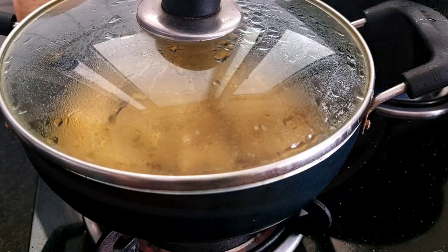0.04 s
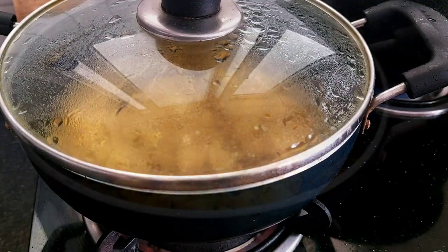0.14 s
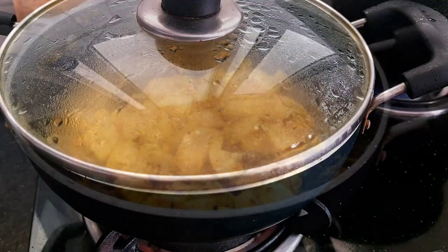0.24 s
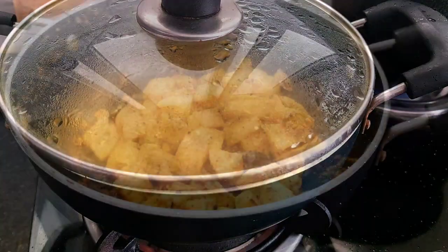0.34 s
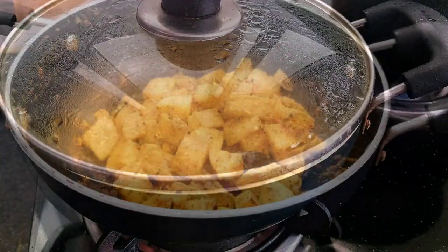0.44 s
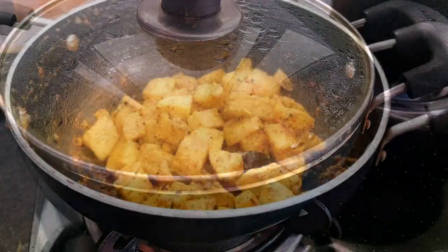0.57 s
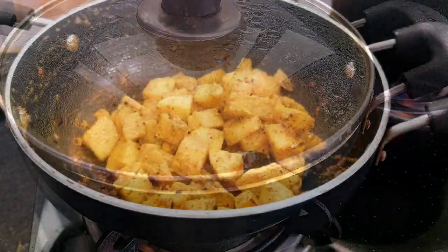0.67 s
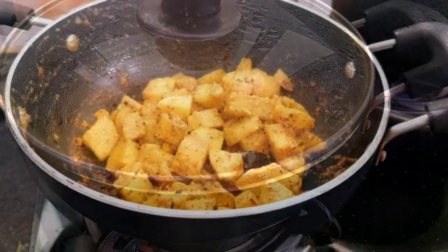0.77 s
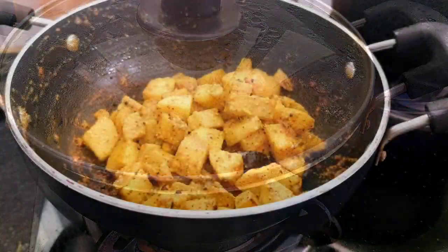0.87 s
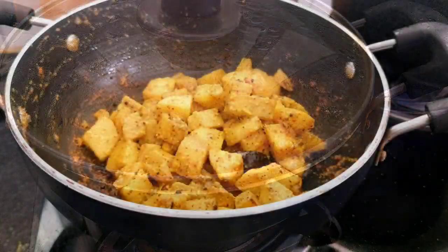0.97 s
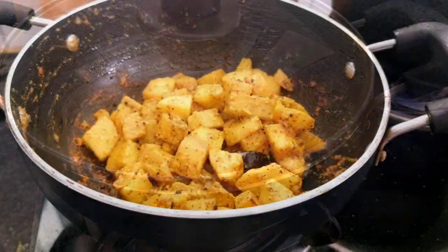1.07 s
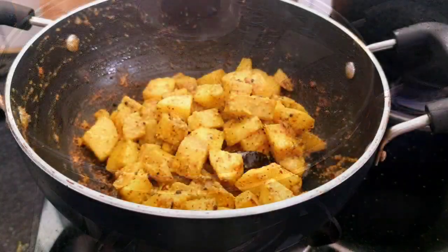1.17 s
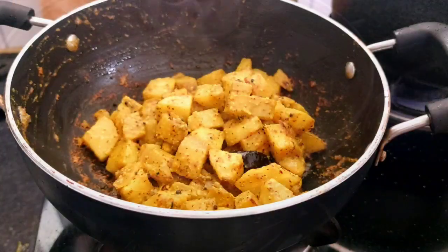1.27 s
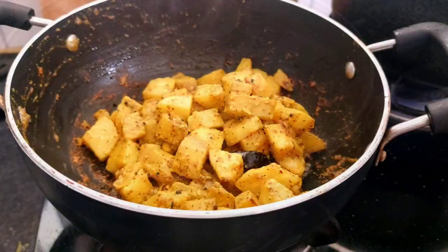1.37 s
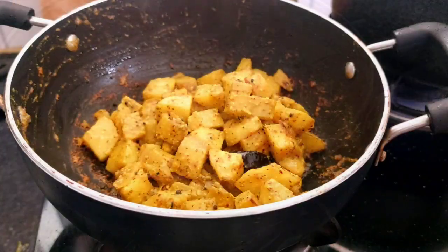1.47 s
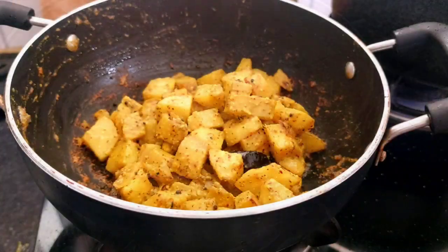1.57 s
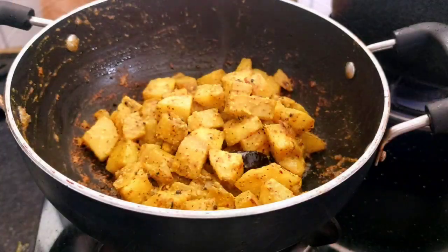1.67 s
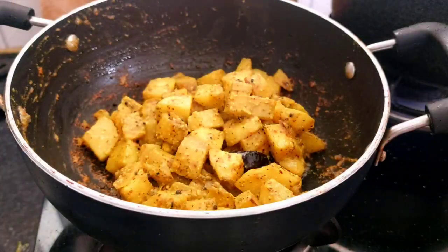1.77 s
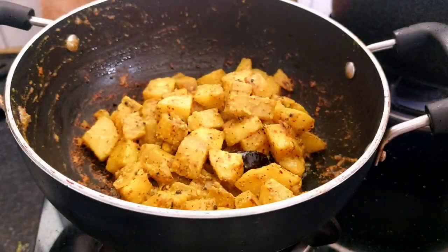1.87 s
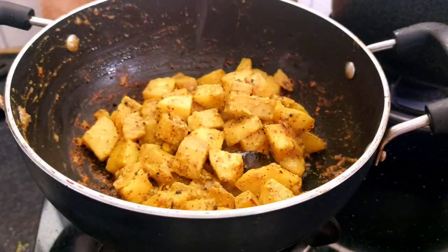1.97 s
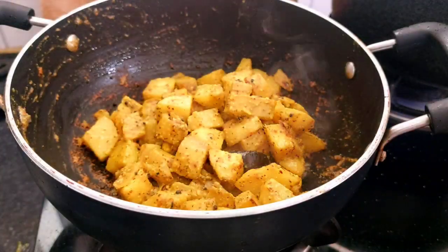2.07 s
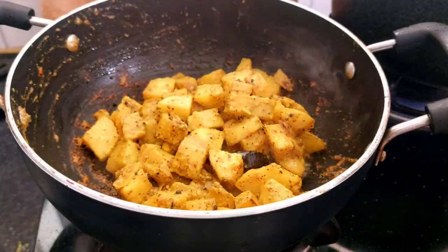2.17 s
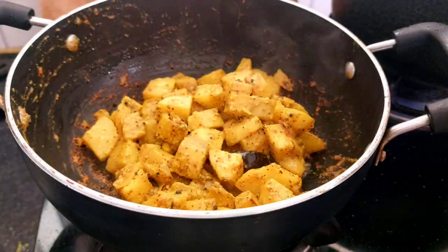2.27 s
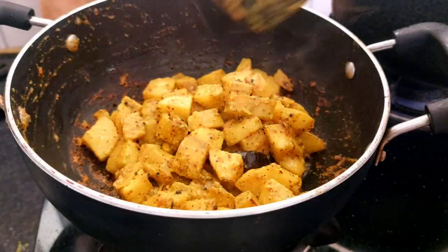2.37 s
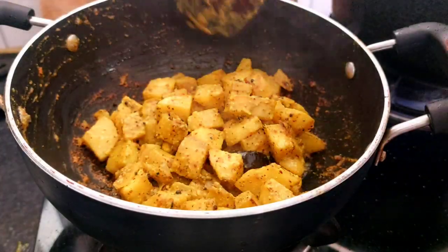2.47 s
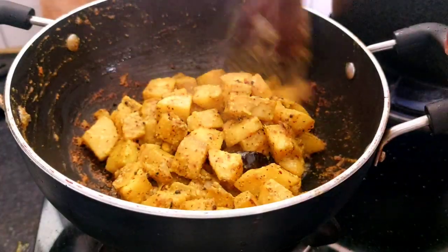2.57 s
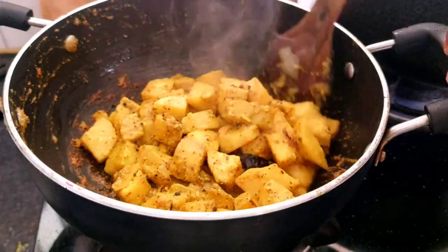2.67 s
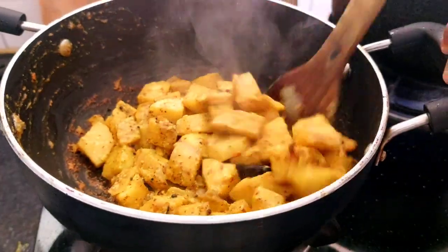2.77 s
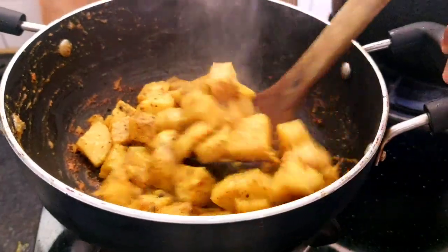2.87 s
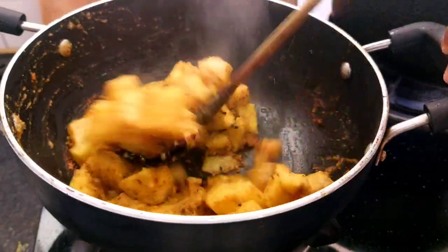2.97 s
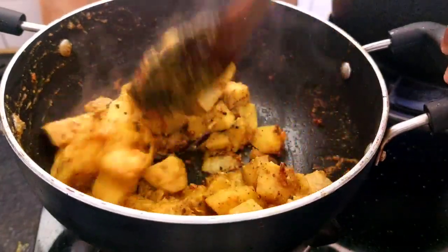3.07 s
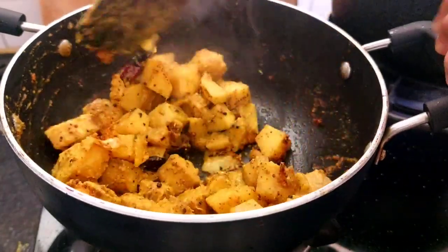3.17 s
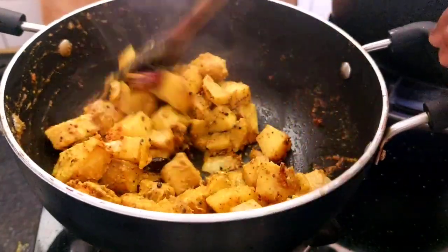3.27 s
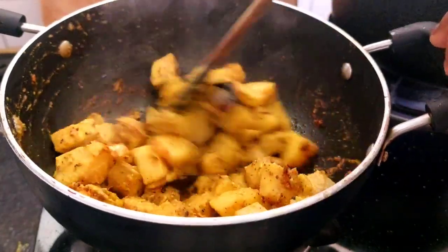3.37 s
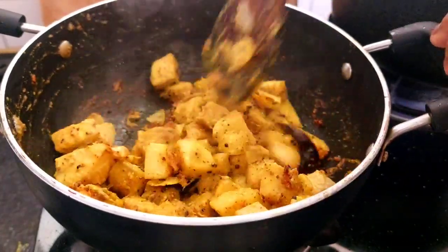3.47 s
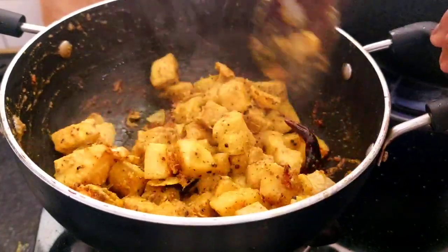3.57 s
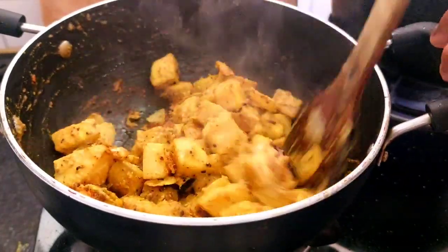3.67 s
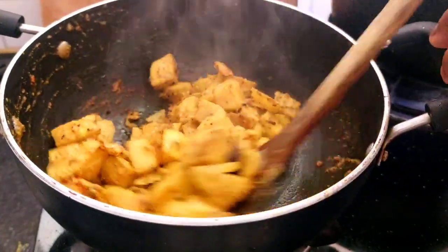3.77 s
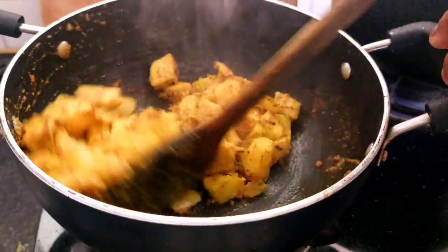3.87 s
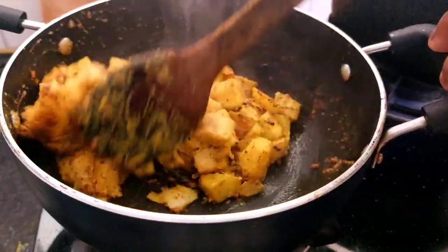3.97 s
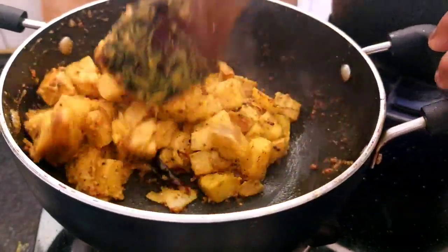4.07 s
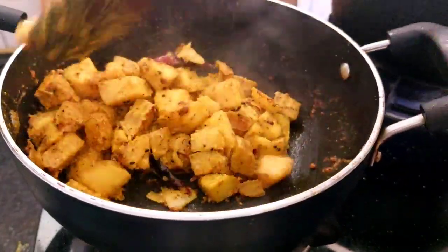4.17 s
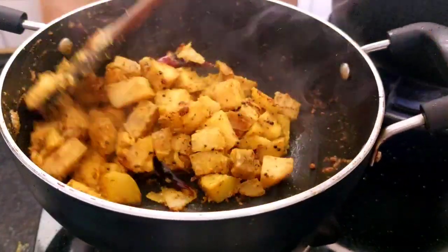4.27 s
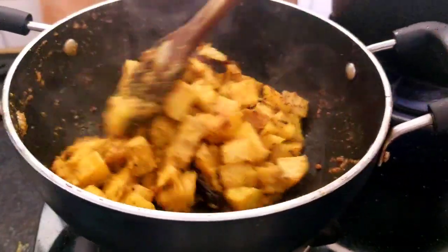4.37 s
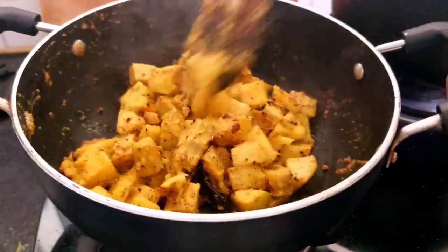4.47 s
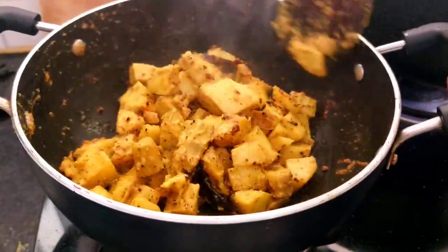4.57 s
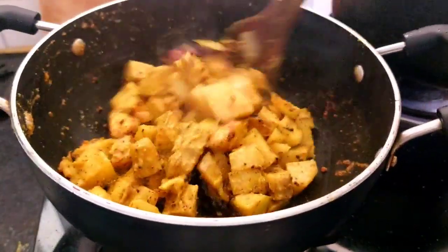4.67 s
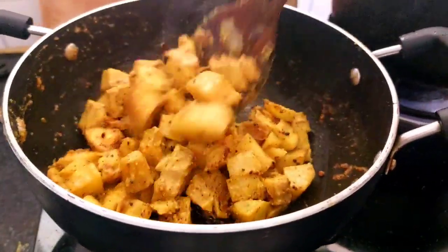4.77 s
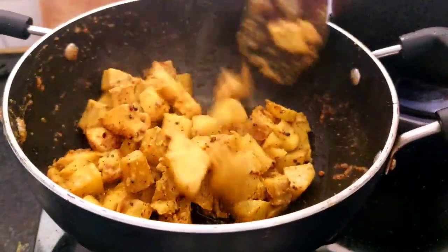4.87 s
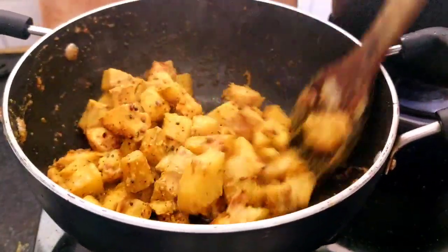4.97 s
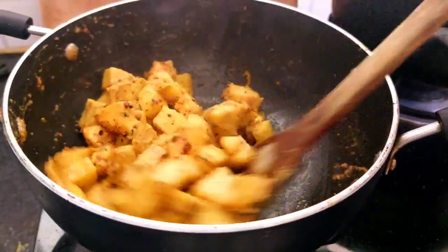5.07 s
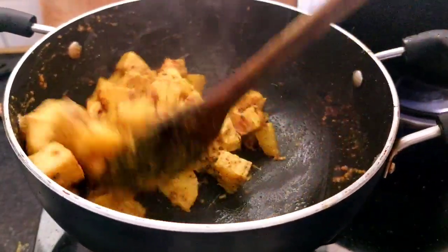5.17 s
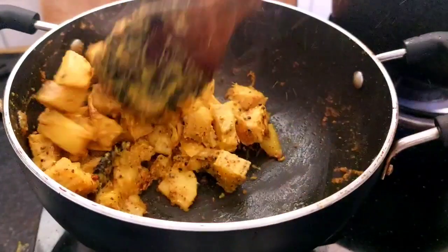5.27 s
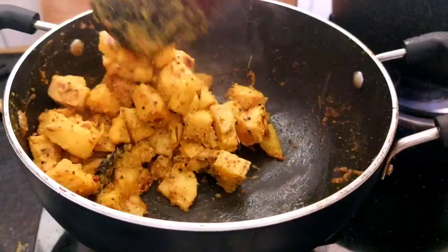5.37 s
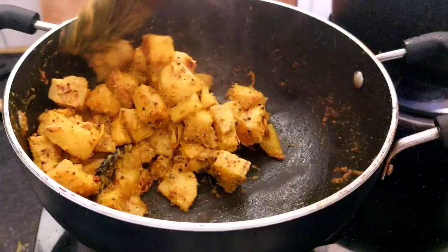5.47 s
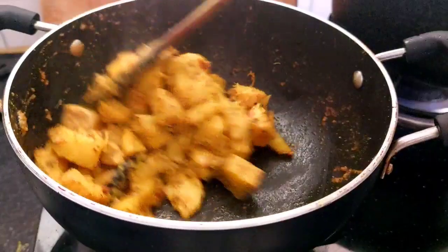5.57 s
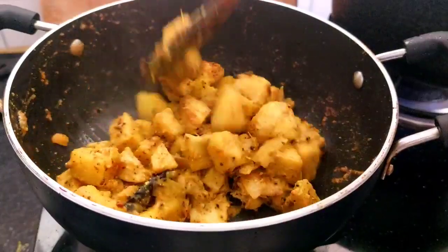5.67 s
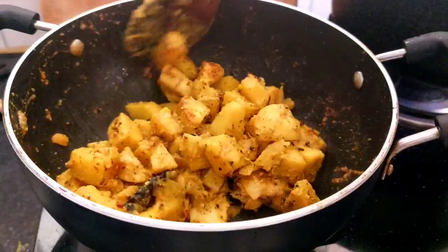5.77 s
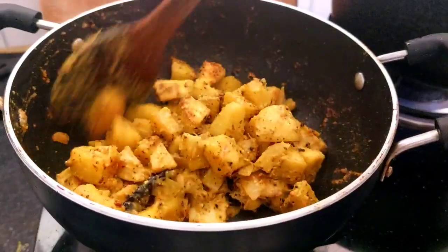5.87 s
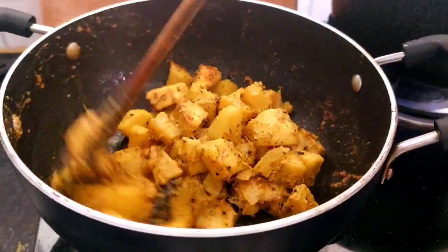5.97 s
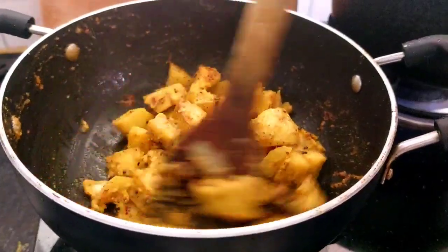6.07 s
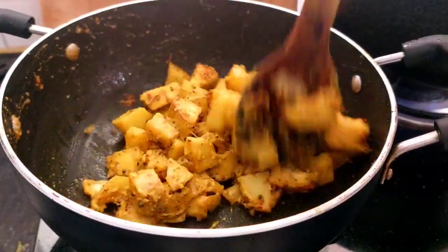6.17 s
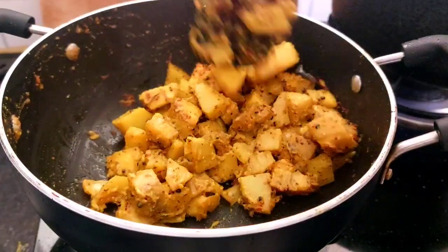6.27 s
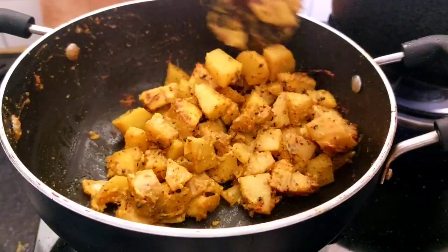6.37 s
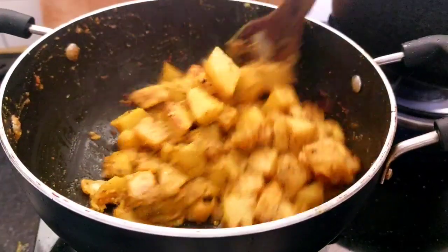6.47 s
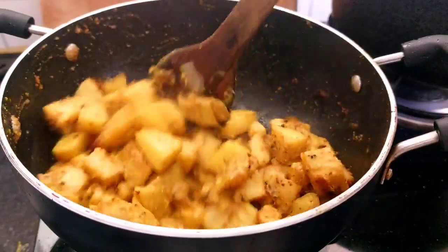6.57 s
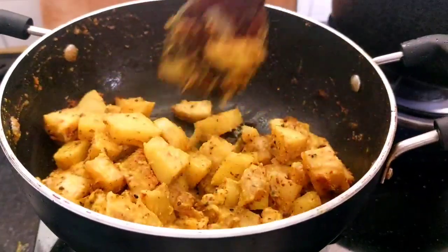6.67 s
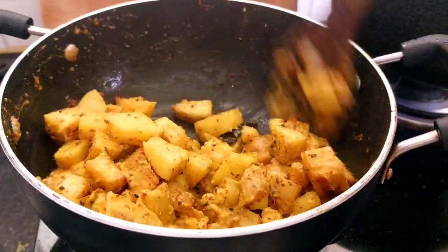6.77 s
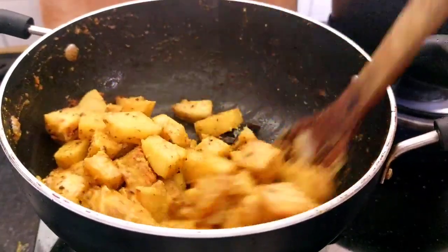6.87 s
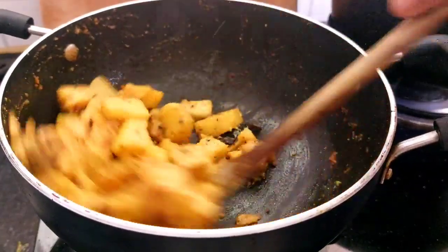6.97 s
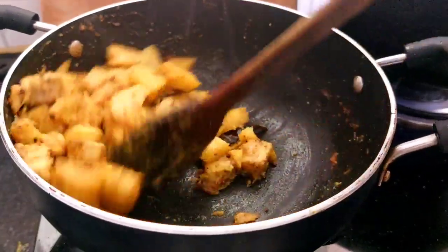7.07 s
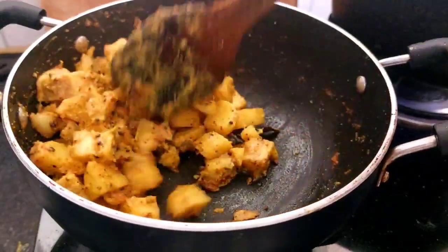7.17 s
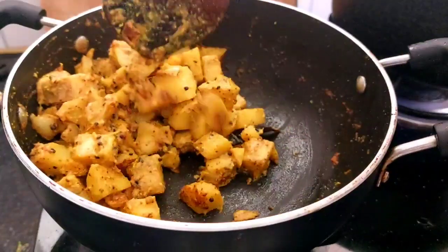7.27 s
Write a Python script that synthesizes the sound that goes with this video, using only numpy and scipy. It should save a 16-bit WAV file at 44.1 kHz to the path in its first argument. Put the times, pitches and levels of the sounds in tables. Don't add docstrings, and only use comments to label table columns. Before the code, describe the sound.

Fading in from silence, soft frying and bright oil spits, a small lid rattle, then wooden spatula knocks and swelling, spitting sizzle up close.

```python
import sys
import numpy as np
from scipy import signal
from scipy.io import wavfile
from scipy.ndimage import uniform_filter1d

SR = 44100
rng = np.random.default_rng(int(sys.argv[2]) if len(sys.argv) > 2 else 0)


def field_ratio(decibels):
    return 10 ** (np.asarray(decibels, dtype=float) / 20)


def unload_audio(sound):
    columns = np.transpose(np.atleast_2d(sound))
    steps = np.round(np.clip(columns, -1, 1) * 32767)
    wavfile.write(sys.argv[1], SR, steps.astype(np.int16))


N = 323253
STIRRED_DB = -32


def evened(x):
    return x / np.sqrt(np.mean(abs(x) ** 2) + 1e-20)


def smooth_2d(x, bins, frames):
    return uniform_filter1d(uniform_filter1d(x, size=bins, axis=0), size=frames, axis=1)


def read(points, hz):
    f, value = np.transpose(points)
    return np.interp(np.log(hz + 1), np.log(f + 1), value)


def ramp(octaves, width_octaves):
    return np.clip(octaves / width_octaves, 0, 1)[:, None]


def bumps(t, s, half_s, db):
    return (db * np.exp(-((t[:, None] - s) / half_s) ** 2)).sum(1)


def add(mix, s, sound):
    part = mix[:, round(s * SR):][:, :sound.shape[1]]
    part += sound[:, :part.shape[1]]


def sides(pan_db):
    return field_ratio(np.array([[pan_db / 2], [-pan_db / 2]]))


def band_gain(db_per_hz, hz, lo_hz, hi_hz):
    inside = (hz >= lo_hz) & (hz < hi_hz)
    return field_ratio(db_per_hz) / np.sqrt(np.sum(field_ratio(2 * db_per_hz[inside])) / len(hz))


# (frequency [Hz], left-right likeness [0-1])
PORT_LIKENESS = [(30, 0.72), (80, 0.82), (200, 0.85), (400, 0.69), (800, 0.59), (1400, 0.88), (2500, 0.049),
                 (5000, 0.03), (16000, 0.031)]
# (frequency [Hz], left lead [rad])
PORT_LEAD = [(30, 0.08), (350, 0.32), (700, 0.21), (1400, 1.82), (2600, 0.45), (16000, 0.12)]
# (frequency [Hz], left over right [dB])
PORT_LEAN = [(30, 4), (80, 6), (160, 1.5), (380, -1), (700, 1.5), (1290, 2.5), (2380, 1.6), (4400, 1),
             (8120, 4), (15000, -1)]


def ports(a, b, hz):
    same = np.clip(read(PORT_LIKENESS, hz), -1, 1)[:, None]
    right = same * a + np.sqrt(1 - same ** 2) * b
    right = right * np.exp(-1j * read(PORT_LEAD, hz))[:, None]
    lean = field_ratio(read(PORT_LEAN, hz) / 2)[:, None]
    return np.array([a * lean, right / lean])


def shaking(t):
    shake_db, shake_s = -21, 0.077
    blows = np.array(SPATULA_BLOWS)
    since = t[:, None] - blows[:, 0]
    return (field_ratio(2 * (blows[:, 1] + shake_db)) * (since > 0) * np.exp(-abs(since) / shake_s)).sum(1)


# (frequency [Hz], density [dB per Hz])
ROAR_COLOUR = [(15, -40), (28, -13), (65, -7), (95, -3), (150, -10.5), (250, -8), (390, -6.5), (520, -13.5),
               (750, -12.5), (1100, -23)]
# (time [s], half length [s], rise [dB])
GROANS = [(0.15, .15, 5), (0.55, 0.087, 4), (1.15, .15, 4), (1.597, 0.19, 10), (2.3, 0.15, 6),
          (2.68, 0.19, 5.5), (3.196, 0.1, 7), (3.446, 0.043, 7), (4.35, .1, 9), (4.64, .06, -2),
          (4.953, .05, 6), (6.6, 0.088, 7)]


def kitchen():
    roar_db, follow_sizzle = -51.5, 0.14
    deep_db, deep_sag_db_per_s = -0.5, 0.85
    s, sizzle_db, _ = np.transpose(FRYING)
    hz, t, z = signal.stft(rng.standard_normal((2, N)), SR, nperseg=2048, noverlap=1536)
    deep = ramp(np.log2(190 / (hz + 1)), 0.39) * (deep_db - deep_sag_db_per_s * t + bumps(t, *np.transpose(GROANS)))
    steady_db = roar_db + follow_sizzle * (np.interp(t, s, sizzle_db) - STIRRED_DB)
    roar = np.sqrt(field_ratio(2 * (steady_db + deep)) + shaking(t))
    lump_db = 1.8 * evened(smooth_2d(rng.standard_normal(z.shape[1:]), 5, 6))
    shape = band_gain(read(ROAR_COLOUR, hz), hz, 150, 600)[:, None]
    z = ports(*z, hz) * shape * roar * field_ratio(lump_db)
    return signal.istft(z, SR, nperseg=2048, noverlap=1536)[1][:, :N]


def ring(modes, length_s, favour_db=0, rise_s=0.0013):
    hz, db, t60 = np.transpose(modes)[:, :, None]
    t = np.arange(round(length_s * SR)) / SR
    hz = hz * rng.uniform(0.93, 1.03, hz.shape)
    waves = np.exp((2j * np.pi * hz - np.log(1000) / t60) * t)
    start_rad = rng.uniform(-0.76, 1.0, hz.shape) + rng.uniform(-0.04, 0.99, (2, *hz.shape))
    start_rad = start_rad + np.array([0 * hz, -read(PORT_LEAD, hz)])
    strength = (field_ratio(db + favour_db) * np.exp(1j * start_rad))[:, :, 0]
    x = (strength @ waves).imag * (1 - np.exp(-t / rise_s))
    return x / abs(x).max()


# (frequency [Hz], level [dB], t60 [s])
STOVE_MODES = [(68, -7, 0.56), (99.3, 8, 0.21)]


def knocks(blows, wall, rim, spread_db, lean_db):
    scatter_db = 3.5
    out, t = np.zeros((2, N)), np.arange(600) / SR
    for s, db, hz, thud_db, hard_db in blows:
        favour_db = -np.minimum(28 * np.log2(np.array(wall)[:, :1] / hz) ** 2, spread_db)
        force = field_ratio(db + 0.34) * sides(lean_db + scatter_db * rng.standard_normal())
        noise = uniform_filter1d(rng.standard_normal((2, 600)), size=12)
        crack = np.gradient(noise, axis=1) * 3.2 * np.exp(-t / 0.0036)
        add(out, s - .001, force * ring(wall, 0.19, favour_db))
        add(out, s - .001, force * field_ratio(hard_db) * ring(rim, 0.066))
        add(out, s - .001, force * field_ratio(hard_db + 6.5) * crack)
        add(out, s, force * field_ratio(thud_db - 2.0) * ring(STOVE_MODES, .22, rise_s=0.011))
    return out


# (time [s], peak [dB], favoured pitch [Hz])
LID_BLOWS = [(0.968, -22.5, 330), (0.988, -24.5, 713), (1.027, -20, 557), (1.04, -18, 400),
             (1.063, -20, 786), (1.067, -23, 347), (1.081, -25, 245), (1.089, -31, 245), (1.104, -28, 544),
             (1.135, -37, 506), (1.158, -36, 537)]
# (frequency [Hz], level [dB], t60 [s])
LID_MODES = [(246, -4.5, 0.16), (345, 4.5, 0.064), (532, -3, 0.19), (592, 2.5, 0.074), (722, 0, 0.12),
             (790, 3.5, 0.045)]
# (frequency [Hz], level [dB], t60 [s])
LID_RIM_MODES = [(993, -4, 0.12), (1145, -2, 0.11), (1490, -3, 0.052), (1910, -8, 0.081)]


def lid():
    thud_db, hard_db = -20, -15
    blows = [(*row, thud_db, hard_db) for row in LID_BLOWS]
    return knocks(blows, LID_MODES, LID_RIM_MODES, spread_db=3.5, lean_db=-2)


# (time [s], peak [dB], favoured pitch [Hz], stove thud re peak [dB], hardness [dB])
SPATULA_BLOWS = [(1.559, -44, 254, 1, -17), (1.794, -23, 416, -22, -16), (2.215, -42.5, 247, -10, -1),
                 (2.599, -30.5, 384, -29, -19), (3.376, -26.5, 247, -9, -2.5), (3.45, -32, 275, -10, -4),
                 (3.699, -30, 300, -15, -6), (4.207, -27.5, 257, -18, 1), (4.36, -31.5, 378, -20, -16),
                 (4.54, -24, 360, -14, -1.5), (4.63, -44, 393, -10, -5), (4.676, -28.5, 385, -25, -7),
                 (4.998, -27, 380, -17.5, -0.5), (5.731, -31.5, 358, -16, -16), (6.169, -43, 393, -12, -8),
                 (6.496, -30, 388, -28, 1), (6.856, -32.5, 345, -26, 10.5)]
# (time [s], peak [dB], favoured pitch [Hz])
FURTHER_BLOWS = [(1.766, -35, 440), (1.781, -31, 430), (1.807, -21, 485), (1.819, -26, 408), (1.834, -31, 410),
                 (1.851, -28, 430), (1.885, -40, 400), (2.622, -37, 390), (3.386, -27, 226), (3.408, -38, 200),
                 (3.463, -29, 237), (3.477, -35, 304), (3.676, -27.5, 367), (3.719, -34, 264), (3.741, -37, 380),
                 (4.241, -30, 245), (4.4, -45, 380), (4.552, -33.5, 250), (4.581, -32, 330), (4.7, -28.5, 300),
                 (4.751, -31, 246), (4.779, -40, 276), (5.022, -32, 260), (5.055, -32, 383), (5.119, -39, 331),
                 (5.77, -39, 350), (6.529, -32, 244), (6.868, -29, 345), (6.888, -43, 272)]
# (frequency [Hz], level [dB], t60 [s])
PAN_MODES = [(231, -6, 0.12), (253.6, 1, 0.16), (345, -5.5, 0.17), (394.6, 5.5, 0.13), (446, 3.5, 0.099),
             (527, -4.5, 0.1)]
# (frequency [Hz], level [dB], t60 [s])
PAN_RIM_MODES = [(648, -2.5, 0.11), (758, 6, 0.062), (845, 3, 0.081), (1090, -1, 0.094), (1320, -12, 0.013),
                 (2170, 0, .03), (2510, 7, 0.025)]


def spatula():
    thud_db, hard_db = -29, -7.5
    further = [(*row, thud_db, hard_db) for row in FURTHER_BLOWS]
    return knocks(SPATULA_BLOWS + further, PAN_MODES, PAN_RIM_MODES, spread_db=12.5, lean_db=-1.5)


# (time [s], peak [dB], pitch [Hz])
SPITS = [(0.1848, -25, 14700), (0.2026, -23, 12400), (0.299, -25, 5180), (0.4202, -29, 13400),
         (0.5739, -26, 15200), (0.6951, -34, 7330), (0.757, -31, 7490), (0.8652, -25, 13400),
         (0.9106, -22, 13000), (0.9271, -24, 13600), (0.9555, -24, 8030), (1.0089, -28, 11500),
         (1.0682, -29, 6570), (1.1146, -29, 12700), (1.186, -28, 7100), (1.4723, -25, 14900),
         (1.554, -28, 15100), (1.6423, -33, 11000), (1.6699, -24, 11100), (1.7347, -24, 8200),
         (1.9966, -31, 14500), (2.0969, -24, 14000), (2.1373, -20, 14000), (2.1583, -18, 14000),
         (2.2275, -14, 13860), (2.286, -16, 12500), (2.5928, -35, 13800), (2.6174, -21, 14800),
         (2.7848, -16.5, 8050), (3.823, -17, 7500)]


def spits():
    lean_db, scatter_db, lead_db, lead_s = 10, 4, -7.0, 0.0011
    out, t = np.zeros((2, N)), np.arange(200) / SR
    for s, db, hz in SPITS:
        noise = rng.standard_normal((2, 200))
        snap = 0.76 * np.sin(2 * np.pi * hz * t) + np.gradient(noise, axis=1)
        snap = snap * t * np.exp(-t / 0.00013)
        snap = snap / abs(snap.mean(0)).max()
        snap = field_ratio(db) * sides(lean_db + scatter_db * noise[0, 0]) * snap
        add(out, s, field_ratio(lead_db) * snap[::-1])
        add(out, s + lead_s, snap)
    return out


def bubbling(s, sizzle_db, fine_db):
    clumps = evened(uniform_filter1d(rng.standard_normal(N), size=700))
    clumps = field_ratio(2.3 * np.clip(clumps, -2, 2))
    burst = field_ratio(2.5 * np.minimum(rng.exponential(1, N), 2)) * (rng.random(N) < 1200 * clumps / SR)
    puff = signal.lfilter([1], [1, -np.exp(-1 / (.0005 * SR))], burst)
    spit_db = -1.5 - 0.24 * (sizzle_db - STIRRED_DB) + 0.13 * fine_db
    spit = field_ratio(np.interp(np.arange(N) / SR, s, spit_db)) * evened(puff)
    hiss, crack = rng.standard_normal((2, 2, N))
    crack = evened(signal.lfilter([1, -.3], [1], crack))
    return (clumps ** 0.074 * hiss + spit * crack) / np.sqrt(uniform_filter1d(1 + spit ** 2, size=8000))


# (time [s], sizzle level [dB], fine spray re sizzle [dB])
FRYING = [(0.1, -52, 1), (0.3, -47.5, -1.5), (1.75, -47, -2), (1.82, -38.5, -10), (1.92, -46, -2),
          (2.07, -44, -6), (2.18, -42.5, 7.5), (2.33, -43.5, 0), (2.6, -46, 1), (2.7, -37.5, -1),
          (2.87, -37, -2), (3.15, -35, -0.5), (3.7, -34, -2), (4.1, -34.5, -0.7), (4.7, -33.5, -3.5),
          (6.4, -34, -0.5), (7.0, -36, -0.7), (7.33, -37, 0)]
# (time [s], rise [dB])
SURGES = [
    (2.77, 3.5),
    (3.46, 1.5),
    (4.0, 1.1),
    (4.52, 0.5),
    (5.1, 1.5),
    (5.85, 1.5),
    (6.66, 2),
    (7.2, 1.5),
]
# (time [s], half length [s], rise [dB])
JUICE = [
    (2.756, 0.077, 4.5),
    (5.048, .1, 1),
    (5.4, 0.15, 1.5),
    (6.383, 0.14, 3.5),
]
# (frequency [Hz], density [dB per Hz])
SIZZLE_COLOUR = [(310, -46), (520, -9), (600, -14), (900, -7), (1200, -9), (1700, -8), (2300, -7),
                 (3800, -4), (6100, -5), (9400, -4.5), (11500, -2.5), (14900, -1), (15700, -1),
                 (16000, -35)]
# (frequency [Hz], width [Hz], level [dB])
PAN_AIR = [(735, 130, 5), (1400, 200, 10), (2060, 300, 3.5), (2900, 500, 3), (5000, 500, 1.5),
           (7600, 900, 2.5), (12400, 1500, 1.5)]


def sizzle():
    surge_half_s, juice_hz, juice_octaves = 0.11, 2350, 0.57
    s, sizzle_db, fine_db = np.transpose(FRYING)
    hz, t, z = signal.stft(bubbling(s, sizzle_db, fine_db), SR, nperseg=1024, noverlap=768)
    surge_s, surge_db = np.transpose(SURGES)
    level_db = np.interp(t, s, sizzle_db) + bumps(t, surge_s, surge_half_s, surge_db)
    spray = ramp(np.log2(hz / 5500 + 1e-9), 1.78) * (np.interp(t, s, fine_db) - 5.0)
    body = ramp(np.log2(2200 / (hz + 1)), .5) * (-1.33 + 0.01 * (level_db - STIRRED_DB))
    juice_band = np.exp(-(np.log2((hz + 1) / juice_hz) / juice_octaves) ** 2)[:, None]
    juice = juice_band * bumps(t, *np.transpose(JUICE))
    patches = evened(smooth_2d(rng.standard_normal(z.shape[1:]), 20, 10))
    flicker = evened(uniform_filter1d(rng.standard_normal(len(t)), size=4))
    air_db = sum(db / (1 + (2 * (hz - f) / width) ** 2) for f, width, db in PAN_AIR)
    shape = band_gain(read(SIZZLE_COLOUR, hz) + air_db, hz, 1800, 6000)[:, None]
    gain_db = level_db + 3.0 + spray + body + juice + 0.4 * patches + 0.077 * flicker
    z = ports(*z, hz) * shape * field_ratio(gain_db)
    return signal.istft(z, SR, nperseg=1024, noverlap=768)[1][:, :N]


def scene():
    return kitchen() + lid() + spatula() + spits() + sizzle()


def roll_off(x):
    return signal.sosfilt(signal.butter(12, 16030, fs=SR, output="sos"), x)


def record(dry):
    fade_start_s, fade_s, fade_power = 0.027, 2.23, 1.57
    t = np.arange(N) / SR
    fade = np.sin(np.pi / 2 * np.clip((t - fade_start_s) / fade_s, 0, 1)) ** fade_power
    fade = fade * (t > .05)
    edge = signal.firwin(1601, 15560, window=("kaiser", 9), fs=SR)[None]
    return roll_off(signal.oaconvolve(dry * fade, edge, "same"))


dry = scene()
out = record(dry)
unload_audio(out)
```